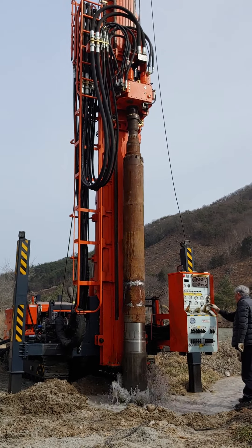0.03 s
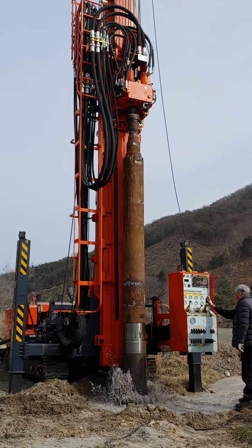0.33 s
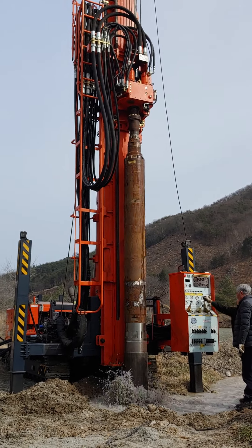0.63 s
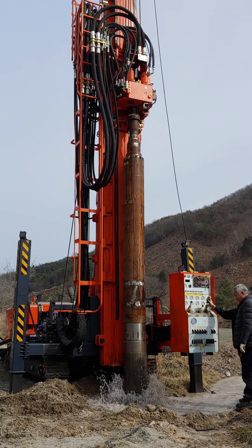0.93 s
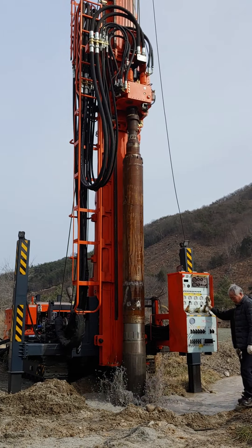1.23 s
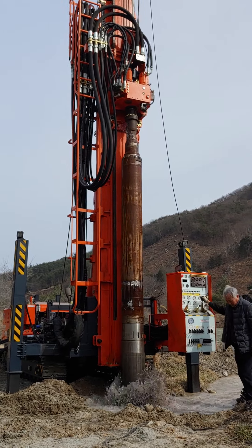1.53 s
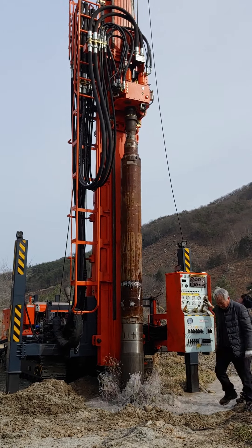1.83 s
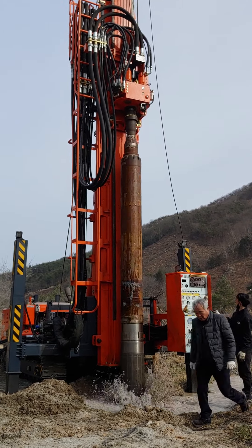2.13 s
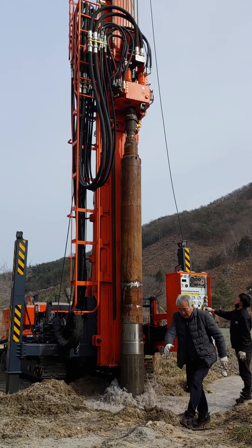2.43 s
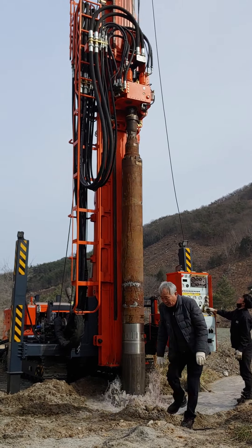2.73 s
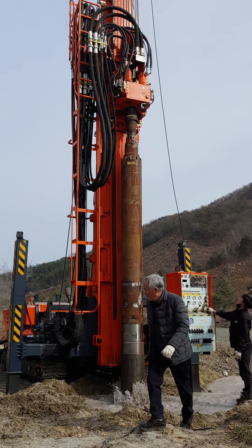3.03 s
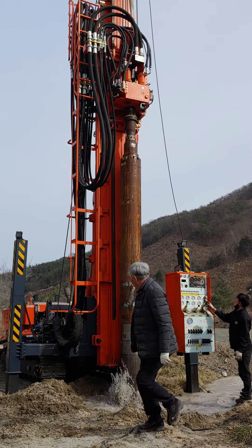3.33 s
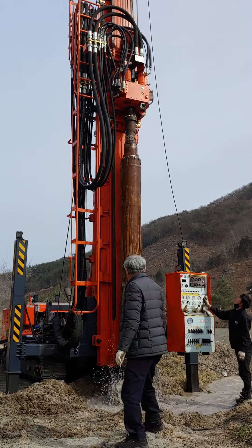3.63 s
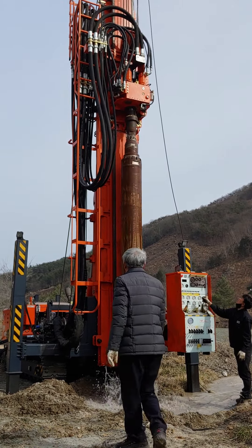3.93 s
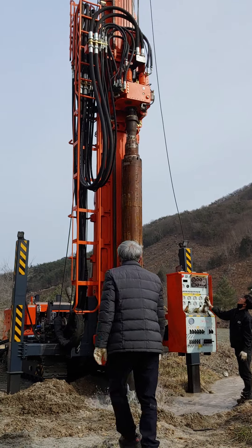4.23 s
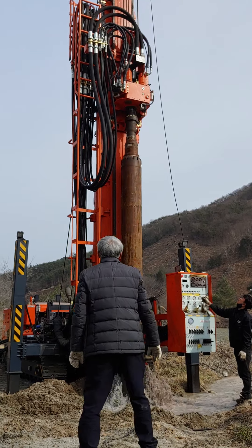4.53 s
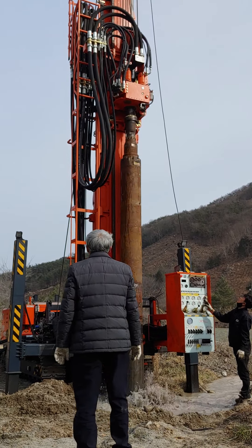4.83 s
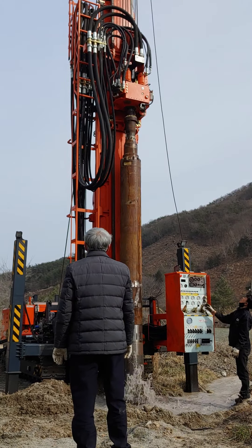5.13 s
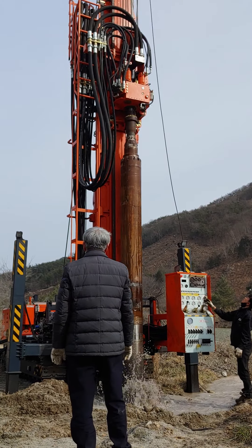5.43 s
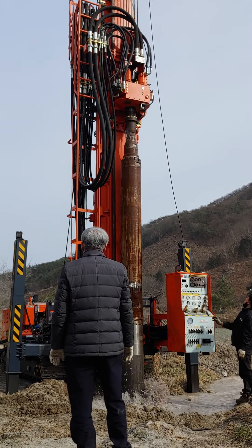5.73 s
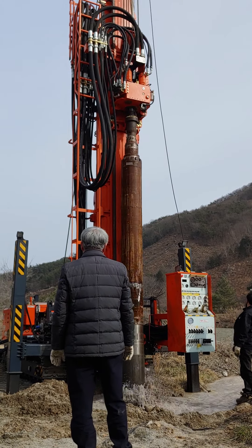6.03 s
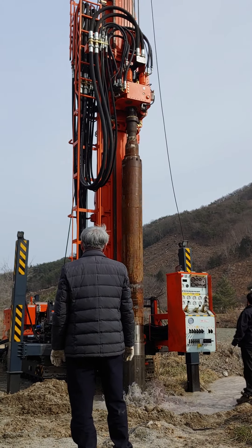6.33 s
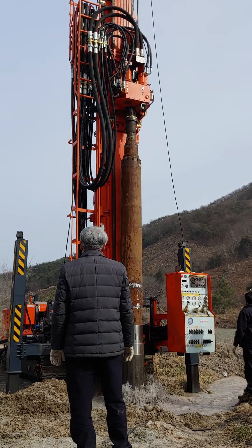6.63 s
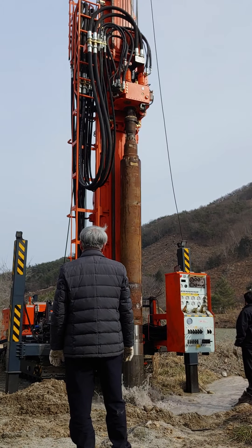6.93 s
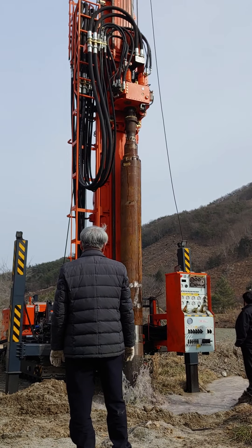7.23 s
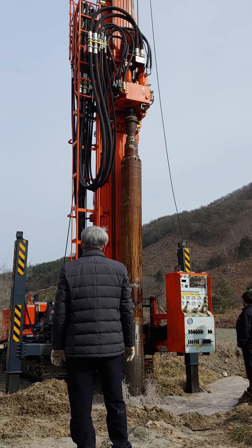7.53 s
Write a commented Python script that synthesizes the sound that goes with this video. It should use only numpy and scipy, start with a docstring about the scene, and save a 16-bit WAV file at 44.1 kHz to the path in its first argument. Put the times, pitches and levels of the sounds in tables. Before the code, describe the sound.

Loud diesel engines roar without a break as a nearby outdoor drill rig pounds a steel pipe with rapid, even, ringing blows. Escaping air hisses throughout, and muddy water splashes, most clearly in the first half. Scattered metal clinks and a few short rasps mix with the hammering. Past the middle the blows ease a little, and a few dull booms come from deep in the hole.

```python
"""Drilling rig sinking a steel casing

An air hammer clanks about 15 times a second, each blow followed by a lighter one, over roaring diesels,
a whining pump and humming ground. Spent air howls and puffs up the hole and throws out muddy water.
Steel squeaks just before each main blow. Now and then the loose casing joint clinks, the turning pipe
rasps against the casing, low notes swell briefly in the engine's roar and the hole gives a low boom."""
import sys
import numpy as np
from scipy import signal
from scipy.fft import rfft, irfft, next_fast_len
from scipy.io import wavfile
from scipy.ndimage import uniform_filter1d, minimum_filter1d, map_coordinates

SR = 44100
rng = np.random.default_rng(int(sys.argv[2]) if len(sys.argv) > 2 else 0)


def digitize_waveform(pressure):
    """Quantize a signal to 16-bit integers and store it at the path in sys.argv[1].

    Rows of a 2-D input are taken as channels; values are limited to [-1, 1].
    """
    field = np.atleast_2d(pressure).T
    bounded = np.clip(field, -1, 1)
    quanta = np.round(bounded * 32767).astype(np.int16)
    wavfile.write(sys.argv[1], SR, quanta)


N = 335160  # 7.6 seconds

# how hard the rig works: (time [s], engine roar [dB], escaping air [dB])
RIG_EFFORT = [(0, -17.5, -25), (1.2, -16.5, -25.5), (2.0, -16, -25), (3.0, -17, -24.5), (3.6, -16.5, -25.5),
              (4.8, -16.5, -26), (7.6, -17, -25.5)]
# low notes of the machinery; the one just above the firing note beats with it: (pitch [Hz], level [dB])
SHAFT_NOTES = [(46.2, -31.5), (73.9, -27), (116.8, -23.5), (289.6, -28), (579.4, -33), (672, -40.5),
               (729.4, -40.5), (868.9, -38), (904.4, -42), (1158.8, -44), (1296, -51)]
# tone colour of the engine's exhaust and fans: (frequency [Hz], level [dB])
ROAR_SPECTRUM = [(15, -29), (24, -23), (45, -7.5), (58, -9), (88, -2.5), (135, -2), (205, -3), (222, -5),
                 (250, -5.5), (325, -9), (480, -9), (580, -15), (1200, -21.5), (3000, -45)]
# peaks and dips that the engine housing adds to the roar: (frequency [Hz], width [Hz], gain [dB])
HOUSING_PEAKS = [(66.4, 5.5, -2), (156, 24, 2.5), (220.3, 4.8, -3), (270, 14, 1), (302, 3.2, -0.5),
                 (396, 21, 3), (500, 15, 0.5), (561, 24, -2), (698, 13, 0.5)]
# how alike a noise is on the left and right: (frequency [Hz], likeness [0 to 1])
STEREO_LIKENESS = [(60, .996), (125, .975), (250, .9), (500, .76), (850, .67), (1200, .35), (2300, .3),
                   (3500, .1)]
# notes of the hydraulic pump: (multiple of its piston rate, level [dB], left minus right [dB])
PUMP_NOTES = [(1, -28.5, -9), (2, -41.5, 14), (3, -42.5, -20), (6, -45, -12.5), (8, -46, 2), (9, -48.5, 5),
              (10, -50.5, 19), (11, -52.5, 18), (12, -50, -21)]
# pace of the hammer's piston: (time [s], rate [strokes/s])
STROKE_RATE = [(0, 15.048), (1.0, 14.775), (1.2, 14.939), (1.9, 14.7), (2.2, 15.104), (3.0, 14.799),
               (3.2, 14.988), (4.1, 14.686), (4.45, 15.127), (4.65, 14.937), (6.6, 14.808), (6.85, 15.055),
               (7.6, 14.94)]
# notes of the shaking ground: (multiple of the stroke rate, level [dB])
GROUND_NOTES = [(4, -25), (5, -38), (6, -41), (11, -30)]
# ringing notes of the air in the hole: (pitch [Hz], width [Hz], level [dB])
HOLE_MODES = [(595, 26, 0), (651, 47, 5), (669, 14.4, 6), (743, 35, 2.5), (774, 51, -2), (864, 72, -6.5),
              (1240, 260, -8)]
# how strongly the hole howls: (time [s], level [dB])
HOWL_LEVEL = [(0, -24), (1.9, -22.5), (3.3, -22), (3.6, -31), (4.4, -23), (5.7, -21), (5.95, -24),
              (7.6, -25.5)]
# tone colour of the escaping air: (frequency [Hz], level [dB])
AIR_SPECTRUM = [(400, -28), (1100, 2), (1450, -2.5), (2400, 0), (3300, -2.5), (3600, -2.5), (3660, 0.5),
                (3740, -3.5), (4900, -3), (5130, -3.5), (5450, -6), (6300, -11.5), (7600, -12), (9000, -21),
                (12000, -19), (15000, -40)]
# water thrown out of the hole: (time [s], level [dB])
WATER_LEVEL = [(0, -44), (1.0, -42.5), (1.2, -32), (1.4, -35), (2.65, -36), (2.95, -29.5), (3.2, -35),
               (3.6, -40), (7.6, -46)]
# clinks of the loose joint, mostly between main blows: (time [s], bright clink [dB], lower clang [dB])
JOINT_CLINKS = [(.005, -16.5, -32), (.072, -21, -23), (.339, -17, -25), (.474, -27, -16), (.606, -14, -8),
                (.742, -15.5, -14), (.809, -15, -21), (.876, -28, -16), (1.146, -18, -21),
                (1.684, -18, -24), (1.751, -17.5, -20), (2.188, -28, -13), (2.49, -22, -26),
                (2.89, -18, -16), (2.992, -17, -14), (3.026, -20, -18), (3.094, -29, -26),
                (3.361, -19, -12), (4.332, -28, -17), (4.401, -22, -19), (5.111, -23, -14)]
# ringing notes of the steel casing: (pitch [Hz], width [Hz], level [dB])
CASING_MODES = [(2280, 180, 3.5), (4070, 180, -8), (4630, 170, 6.5), (5190, 110, 7), (5600, 780, 4),
                (6590, 1580, 3.5)]
# ringing notes of the casing joint: (pitch [Hz], width [Hz], level [dB])
JOINT_MODES = [(3800, 700, 0), (4700, 450, 5.5)]
# strength of the squeak before each main blow: (time [s], level [dB])
SQUEAK_LEVEL = [(0, -28), (.65, -29), (.95, -32), (1.2, -29.5), (1.5, -35), (1.7, -35), (2.4, -25),
                (2.6, -32), (2.98, -20), (3.12, -30), (3.35, -28), (3.6, -39), (3.87, -29), (4.38, -29),
                (4.85, -37), (5.2, -32), (6.25, -33), (6.65, -39), (7.4, -32)]
# how loud the hammer blows sound, softer from halfway on: (time [s], level [dB])
BLOW_LEVEL = [(0, -13.5), (.35, -12.7), (.65, -13), (.85, -14), (.98, -11.8), (1.25, -13), (1.42, -16),
              (1.75, -12.5), (2.15, -13.5), (2.4, -15), (2.6, -12.7), (2.88, -16), (3.05, -12.2),
              (3.25, -14), (3.4, -12.5), (3.55, -18), (4.2, -16), (4.5, -18), (4.9, -18.5), (5.3, -15.7),
              (5.8, -17.7), (6.05, -15.3), (6.6, -19.5), (7.2, -16), (7.6, -15.5)]
# low ring of the ground around the hole: (pitch [Hz], width [Hz], level [dB])
GROUND_MODES = [(145, 100, 0)]
# rubs of the pipe against the casing: (start [s], length [s], level [dB])
PIPE_RUBS = [(1.045, .08, -29), (2.702, 0.062, -27.5), (2.758, 0.071, -26), (2.84, 0.052, -31)]
# ringing note of the rubbed pipe: (pitch [Hz], width [Hz], level [dB])
PIPE_MODES = [(2320, 290, 0)]
# brief low-pitched swells in the engine's roar: (time [s], lowest note [dB], upper two notes [dB])
ROAR_SWELLS = [(1.232, -15, -5), (1.745, -4, -17), (1.965, -9, -11), (3.534, -14, -2), (3.592, -6, -8),
               (3.664, -5, -17), (3.789, -15, -7), (4.209, -5, -23), (4.484, -7, -18), (6.011, -18, -6),
               (6.753, -3, -7), (7.15, -9, -6)]
# notes of such a swell, the lowest first: (pitch [Hz], level [dB], time to fade by 60 dB [s])
SWELL_NOTES = [(269, 0.5, 0.099), (396, -1, 0.08), (492, -5, 0.064)]
# dull booms from deep in the hole: (time of the peak [s], level [dB])
HOLE_BOOMS = [(3.995, -15), (4.27, -13.5), (5.62, -16.5)]
# tone colour of the left microphone opening: (frequency [Hz], gain [dB])
LEFT_COLOUR = [(400, 0.5), (650, 2.5), (1200, 2.5), (1650, 2.5), (2600, 0.5), (4500, 1), (6200, 2.5),
               (7400, 0), (8900, 3.5), (9250, -15), (9700, 4), (10400, -3), (12000, 3.5), (12800, -15.5)]
# tone colour of the right microphone opening: (frequency [Hz], gain [dB])
RIGHT_COLOUR = [(400, -0.5), (650, -1), (1300, 1.5), (1700, 7), (2150, 6), (2700, 1.5), (5500, 0.5),
                (6200, 3.5), (7000, 16.5), (7600, 9.5), (8800, -14), (9700, -7.5), (12000, -6),
                (15000, -16)]
# sound reaches the right side later, except in the bass: (frequency [Hz], delay [s])
RIGHT_DELAY = [(150, 0), (450, .00007), (720, .00013), (1000, .00026), (1450, .00034)]


def amp(db):
    """Turn decibels into a factor to multiply by."""
    return 10 ** (np.asarray(db) / 20)


def unit(x):
    """Scale a signal to an average strength (rms) of 1."""
    return x / np.sqrt(np.mean(x ** 2) + 1e-20)


def along(points, hz):
    """Read a (frequency, value) table at hz, joining its points on a log scale."""
    freqs, values = np.transpose(points)
    return np.interp(np.log(hz + 1), np.log(freqs + 1), values)


def curves(rows):
    """Turn each column after the time into a curve with one value per sample."""
    times, *columns = np.transpose(rows)
    return [np.interp(np.arange(N) / SR, times, column) for column in columns]


def wobble(rate):
    """A smooth random curve through `rate` points a second."""
    points = rng.standard_normal(int(N * rate / SR) + 4)
    return map_coordinates(points, [np.arange(N) * rate / SR], order=2)


def filtered(x, response):
    """Multiply each frequency in x by response(frequency)."""
    size = next_fast_len(N + SR // 4)
    return irfft(rfft(x, size) * response(np.fft.rfftfreq(size, 1 / SR)), size)[..., :N]


def resonate(x, modes):
    """Make x ring at each (pitch, width, level) mode; narrower modes ring longer."""
    def response(f):
        return sum((-1) ** k * amp(db) * 1j * f * width / (hz * hz - f * f + 1j * f * width)
                   for k, (hz, width, db) in enumerate(modes))
    return filtered(x, response)


def rush(spectrum, patchy_db):
    """Rushing noise, alike on both sides in the bass; patchy_db makes random patches louder or softer."""
    cells = signal.stft(rng.standard_normal((2, N)), nperseg=512)[2]
    patches = uniform_filter1d(rng.standard_normal(cells.shape[1:]), size=5, axis=0)
    patches = uniform_filter1d(patches, size=12, axis=1)
    noise = signal.istft(cells * amp(patchy_db * unit(patches)), nperseg=512)[1][:, :N]

    def colour_and_spread(hz):
        angle = np.arccos(np.clip(along(STEREO_LIKENESS, hz), -1, 1)) / 2
        return amp(along(spectrum, hz)) * [np.cos(angle), np.sin(angle)]
    mid, side = filtered(noise, colour_and_spread)
    return unit(np.array([mid + side, mid - side]))


def tone(hz):
    """A pure note of rms 1 that follows a pitch curve."""
    return np.sqrt(2) * np.sin(2 * np.pi * (np.cumsum(hz) / SR + rng.random()))


def strokes(first_blow_s=0.0386):
    """The piston's stroke count at each sample; main blows land on whole numbers."""
    count = np.cumsum(curves(STROKE_RATE)[0]) / SR
    return count - count[round(first_blow_s * SR)]


def engine(firing_hz=68.9, thrum_db=-16.5, throb_db=0.7, waver_db=0.8, roar_boost_db=4.5):
    """The diesel's firing note throbs among the shaft notes and the broad roar of exhaust and fans."""
    def housing(f):
        return amp(sum(db * np.exp(-((f - hz) / width) ** 2) for hz, width, db in HOUSING_PEAKS))
    speed = 1 + 0.0007 * wobble(2.5)
    thrum = amp(thrum_db + throb_db * wobble(8)) * tone(firing_hz * speed)
    drones = sum(amp(db + waver_db * wobble(4.6)) * tone(hz * speed) for hz, db in SHAFT_NOTES)
    roar = unit(filtered(rush(ROAR_SPECTRUM, patchy_db=1.07), housing))
    return thrum + drones + amp(curves(RIG_EFFORT)[0] + roar_boost_db) * roar


def pump(piston_hz=262.45, waver_db=0.2):
    """The hydraulic pump whines on multiples of its piston rate."""
    hz = piston_hz * (1 + 0.00085 * wobble(4))
    sides = np.array([[0.5], [-0.5]])
    return sum(amp(db - waver_db * wobble(8) + pan_db * sides) * tone(multiple * hz)
               for multiple, db, pan_db in PUMP_NOTES)


def ground_hum(waver_db=0.5):
    """The pounding hums in the ground and beats against the engine's firing note."""
    rate = curves(STROKE_RATE)[0]
    return sum(amp(db + waver_db * wobble(9.3)) * tone(multiple * rate) for multiple, db in GROUND_NOTES)


def hole_howl(gain_db=-5):
    """Swirling air rings in the open hole with a hollow howl."""
    flow = rush([(400, -24), (600, 2.5), (1300, -3.5), (2000, -15)], patchy_db=0)
    return amp(curves(HOWL_LEVEL)[0] + gain_db) * unit(resonate(flow, HOLE_MODES))


def spent_air(puff_db=0.84, puff_delay_s=0.0014, waver_db=0.05):
    """Spent air hisses out of the hole and swells a little with every blow, twice a stroke."""
    puff_count = 2 * (strokes() - puff_delay_s * curves(STROKE_RATE)[0])
    swell_db = puff_db * np.cos(2 * np.pi * puff_count)
    level = amp(curves(RIG_EFFORT)[1] + swell_db - waver_db * wobble(22))
    return level * rush(AIR_SPECTRUM, patchy_db=1)


def splash(count=5000, centre_hz=2300, pitch_spread=0.34, size_db=4):
    """Muddy water falls back as bubbles and drops, each a tiny fading note."""
    when, pan = rng.random((2, count))
    hz = np.clip(centre_hz * np.exp(pitch_spread * rng.standard_normal(count)), 300, 12000)[:, None]
    size = amp(size_db * np.minimum(rng.exponential(size=count), 4))[:, None]
    samples = np.arange(SR // 100)
    cycles = hz * samples / SR
    drops = size * np.sin(2 * np.pi * cycles) * np.exp(-cycles / 2)
    index = ((when * N).astype(int)[:, None] + samples).ravel()
    water = [np.bincount(index, (drops * share[:, None]).ravel(), N)[:N] for share in (pan, 1 - pan)]
    return amp(curves(WATER_LEVEL)[0]) * unit(np.array(water))


def joint_clinks(rise_s=0.0012, fade_s=0.061):
    """The loose joint chatters briefly, ringing both the casing and itself."""
    t = np.arange(SR // 10) / SR
    shape = (1 - np.exp(-t / rise_s)) * amp(-60 * t / fade_s)
    force = np.zeros((2, 2, N + len(t)))  # casing or joint, left or right, sample
    for time_s, *levels in JOINT_CLINKS:
        start = round(time_s * SR)
        chatter = shape * rng.standard_normal((2, 2, len(t)))
        force[..., start:start + len(t)] += amp(levels)[:, None, None] * chatter
    return resonate(force[0, :, :N], CASING_MODES) + resonate(force[1, :, :N], JOINT_MODES)


def steel_squeak(pitch_hz=5140, width_hz=200, lead_s=0.0045, width_s=0.0034, scatter_db=1.5):
    """Steel scrapes on one high, rough note as the piston comes down, just before it strikes."""
    from_blow_s = ((strokes() + .5) % 1 - .5) / curves(STROKE_RATE)[0]
    swell = np.exp(-((from_blow_s + lead_s) / width_s) ** 2)
    pan_db = np.array([[-2], [2]])  # louder on the right
    level = amp(curves(SQUEAK_LEVEL)[0] - scatter_db * wobble(14) + pan_db)
    note = unit(resonate(rng.standard_normal((2, N)), [(pitch_hz, width_hz, 0)]))
    return level * swell * note


def blows(main_scatter_db=0.4, light_scatter_db=1, light_mean_db=-27.5, light_follows=0.39):
    """Times and levels of the blows: a main one every stroke, a lighter one half a stroke later."""
    count, level_db = strokes(), curves(BLOW_LEVEL)[0]
    whole = np.arange(int(count[-1]) + 1)
    main, light = np.searchsorted(count, [whole, whole + .5])
    chance = rng.standard_normal((len(whole), 2))
    main_db = level_db[main] + main_scatter_db * chance[:, 0]
    swing_db = level_db[main] - level_db.mean()
    light_db = light_mean_db + light_follows * swing_db + light_scatter_db * chance[:, 1]
    return np.concatenate([main, light]) / SR, np.concatenate([main_db, light_db])


def hammer(scrape_db=-13.5, crack_db=14.5, rattle_db=-5.3, fade_s=0.065, thud_db=24, cutoff_hz=9500):
    """Each blow scrapes briefly, cracks, rattles on through the casing and thuds in the ground."""
    times, levels = blows()
    t = np.arange(-SR // 80, SR // 20) / SR  # the blow lands at t = 0
    scrape = amp(scrape_db) * np.exp(-((t + 0.0043) / 0.0035) ** 2)
    crack = (t == 0) * amp(crack_db)
    rattle = (t > 0) * amp(rattle_db - 60 * np.abs(t) / fade_s)
    # the crack reaches both sides directly; the rattle arrives from all over the rig
    noise = rng.standard_normal((len(times), 2, len(t)))
    hits = amp(levels)[:, None, None] * (crack + (rattle + scrape) * noise)
    index = np.clip(np.round((times[:, None] + t) * SR).astype(int), 0, N).ravel()
    force = np.array([np.bincount(index, hits[:, side].ravel(), N + 1)[:N] for side in range(2)])
    # soft soil passes only the low end of the blow
    thud = resonate(resonate(force.mean(axis=0), GROUND_MODES), GROUND_MODES)
    # the contact lasts too long to ring the highest treble
    clank = filtered(resonate(force, CASING_MODES), lambda f: 1 / np.sqrt(1 + (f / cutoff_hz) ** 10))
    return clank + amp(thud_db) * thud


def pipe_rasps(rough_db=5.5, slips_per_s=150):
    """The turning pipe sticks and slips on the casing in short, swelling rubs."""
    t = np.arange(N) / SR
    pressure = sum(amp(db) * np.sin(np.pi * np.clip((t - start) / length, 0, 1))
                   for start, length, db in PIPE_RUBS)
    slips = rng.standard_normal((2, N)) * amp(rough_db * wobble(slips_per_s))
    return pressure * unit(resonate(resonate(slips, PIPE_MODES), PIPE_MODES))


def roar_swells(rise_s=0.0034):
    """Brief low-pitched swells stand out in the engine's roar, each three quickly fading notes."""
    t = np.arange(SR // 6) / SR
    track = np.zeros(N + len(t))
    for time_s, low_db, upper_db in ROAR_SWELLS:
        notes = sum(amp(swell_db + db - 60 * t / fade_s) * np.sin(2 * np.pi * (hz * t + rng.random()))
                    for swell_db, (hz, db, fade_s) in zip((low_db, upper_db, upper_db), SWELL_NOTES))
        start = round(time_s * SR)
        track[start:start + len(t)] += (1 - np.exp(-t / rise_s)) * notes
    return track[:N]


def hole_booms(pitch_hz=125, waver=0.0614, width_s=0.032):
    """A low, wavering note swells briefly from deep in the hole."""
    t = np.arange(N) / SR
    swell = sum(amp(db) * np.exp(-((t - peak_s) / width_s) ** 2) for peak_s, db in HOLE_BOOMS)
    return swell * tone(pitch_hz * (1 + waver * wobble(40)))


def scene():
    """The whole rig at work, in stereo."""
    steady = engine() + pump() + ground_hum() + hole_howl() + spent_air() + splash()
    steel = joint_clinks() + steel_squeak() + hammer() + pipe_rasps()
    return steady + steel + roar_swells() + hole_booms()


def record(dry, notch_hz=8480, notch_width_hz=900, ceiling=0.99, top_hz=15050):
    """Two microphone openings colour the sound, and a limiter turns down the highest peaks."""
    def microphone(f):
        colour = amp([along(LEFT_COLOUR, f), along(RIGHT_COLOUR, f)])
        delay = np.exp(-2j * np.pi * f * along(RIGHT_DELAY, f) * np.array([[0], [1]]))
        notch = (notch_hz ** 2 - f * f) / (notch_hz ** 2 - f * f + 1j * f * notch_width_hz)
        return colour * delay * notch ** 2
    heard = filtered(dry, microphone)
    safe_gain = ceiling / np.maximum(np.abs(heard).max(axis=0), ceiling)
    smooth_gain = uniform_filter1d(minimum_filter1d(safe_gain, size=900), size=900)
    return filtered(heard * smooth_gain, lambda f: f < top_hz)


dry = scene()
out = record(dry)
digitize_waveform(out)
```